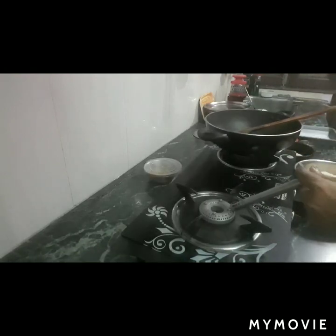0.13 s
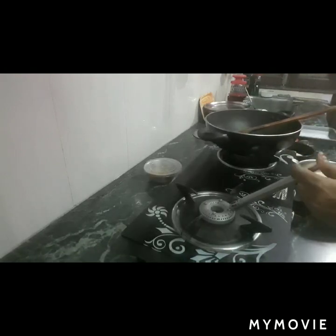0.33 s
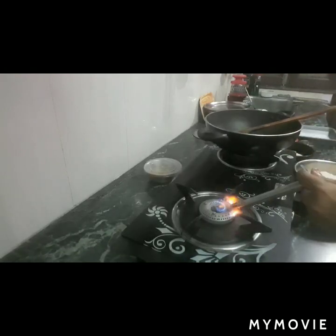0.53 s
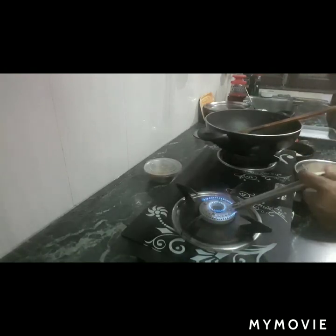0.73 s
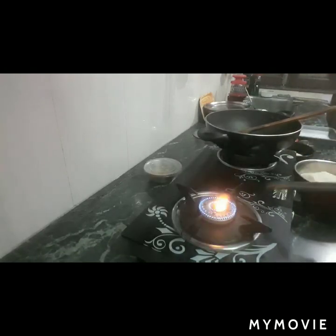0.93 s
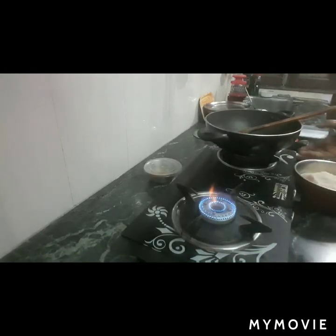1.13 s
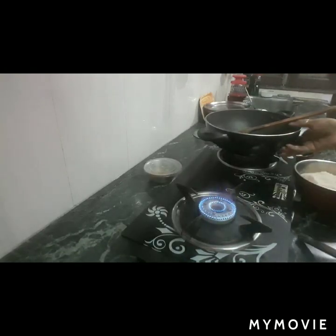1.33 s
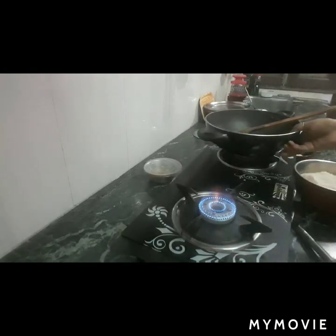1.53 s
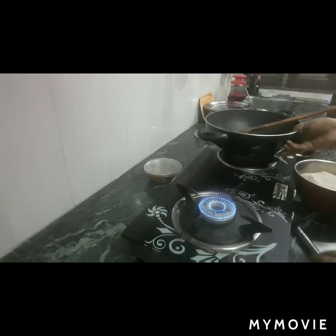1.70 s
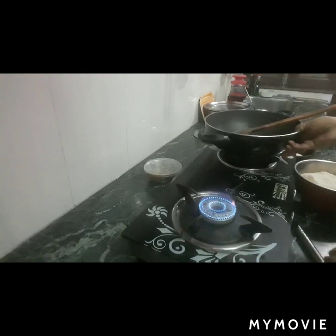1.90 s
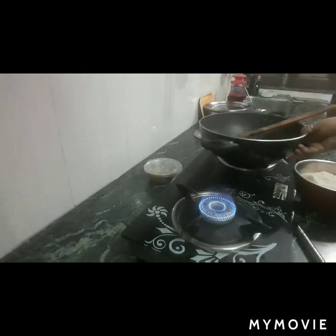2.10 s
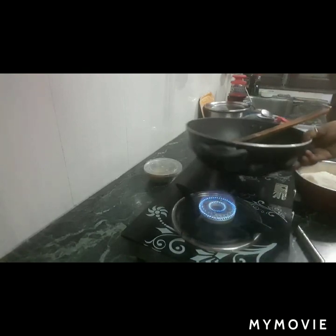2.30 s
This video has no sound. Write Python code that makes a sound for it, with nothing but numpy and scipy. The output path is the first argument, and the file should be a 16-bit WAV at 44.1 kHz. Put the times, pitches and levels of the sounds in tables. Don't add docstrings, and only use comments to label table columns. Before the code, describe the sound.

A spring gas lighter snaps loudly twice, a burner softly catches, then a metal pan clanks

```python
import sys
import numpy as np
from scipy import signal
from scipy.fft import rfft, irfft
from scipy.io import wavfile
from scipy.ndimage import uniform_filter1d

SR = 44100
rng = np.random.default_rng(int(sys.argv[2]) if len(sys.argv) > 2 else 0)


def int16_out(signal):
    q = np.round(np.clip(np.atleast_2d(signal).T, -1, 1) * 32767)
    wavfile.write(sys.argv[1], SR, q.astype(np.int16))


def decibels_to_gain(level_db):
    exponent = np.asarray(level_db, float) / 20
    return 10 ** exponent


N = 103635


def evened(x):
    return x / np.sqrt(np.mean(x ** 2) + 1e-20)


def read(points, hz):
    f, value = np.transpose(points)
    return np.interp(np.log(hz + 1), np.log(f + 1), value)


def add(mix, s, sound):
    part = mix[round(s * SR):][:len(sound)]
    part += sound[:len(part)]


def resonate(x, hz, width_hz):
    r = np.exp(-np.pi * width_hz / SR)
    return 2 * signal.lfilter([1 - r], [1, -r * np.exp(2j * np.pi * hz / SR)], x).real


def coloured(x, db):
    y = irfft(rfft(x) * decibels_to_gain(db), len(x))
    return y / np.sqrt(np.mean(y ** 2))


def blows(events, crack_colour, body, ring_db, size=4096):
    rise_s, body_fade_s, evenness = 0.00053, 0.03, 1.1
    t, hz = np.arange(size) / SR, np.fft.rfftfreq(size, 1 / SR)
    cracks, body_rings = np.zeros((2, N))
    f, width_hz, mode_db = np.transpose(body)[:, :, None]
    modes = np.sqrt(width_hz) / (width_hz + 2j * (hz - f))
    for s, db, length_s, tilt_db in events:
        tilt = tilt_db * np.log2(np.clip(hz, 300, 15000) / 3000)
        shape = (1 - np.exp(-t / rise_s)) * np.exp(-t / length_s)
        burst = rfft(rng.standard_normal(size) * shape)
        burst = burst / np.sqrt(abs(burst) + 1e-9) ** evenness

        spot_db = 2.5 * rng.standard_normal((len(body), 1))
        response = (decibels_to_gain(mode_db + spot_db) * modes).sum(0)
        ring = irfft(burst * decibels_to_gain(tilt) * response) * np.exp(-t / body_fade_s)
        crack = irfft(burst * decibels_to_gain(read(crack_colour, hz) + tilt)) * shape ** 0.37

        energy = np.linalg.norm(shape)
        add(cracks, s, decibels_to_gain(db) * crack * energy / np.linalg.norm(crack))
        add(body_rings, s, decibels_to_gain(db + ring_db) * ring * energy / np.linalg.norm(ring))
    return np.array([cracks, body_rings])


def rings(events, rise_s):
    blur_share = 0.5
    t, out = np.arange(SR // 2) / SR, np.zeros(N)
    for s, hz, db, t60_s in events:
        near, turn = rng.random(2)
        neighbour_hz = hz + (2 + 3 * near) / t60_s
        pair = np.sin(2 * np.pi * hz * t)
        pair += blur_share * np.sin(2 * np.pi * (neighbour_hz * t + turn / 4))
        envelope = (1 - np.exp(-t / rise_s)) * decibels_to_gain(db - 60 * t / t60_s)
        add(out, s, envelope * pair / (1 + blur_share / 2))
    return out


def kitchen(x):
    # (frequency [Hz], t60 [s])
    decay = [(150, 0.28), (600, 0.5), (2000, 0.33), (5000, 0.35), (10000, 0.28), (16000, 0.27)]
    level_db, onset_s, spacing = -4, 0.0023, 12
    taps = np.zeros(SR)
    at = np.arange(0, SR - spacing, spacing)
    taps[at + rng.integers(0, spacing, len(at))] = rng.choice([-1., 1.], len(at))
    hz, t, z = signal.stft(taps, SR, nperseg=256)
    tail = signal.istft(z * decibels_to_gain(-60 * t / read(decay, hz)[:, None]), SR, nperseg=256)[1]
    tail = tail * (1 - np.exp(-np.arange(len(tail)) / SR / onset_s))
    return decibels_to_gain(level_db) * signal.fftconvolve(x, tail / np.linalg.norm(tail))[:N]


def background():
    # (frequency [Hz], level [dB])
    air_colour = [(40, -28), (100, -23.5), (310, 0.5), (420, -7.5), (1000, -8.5), (3000, -15.5),
                  (7000, -21), (16000, -27.5)]
    # (frequency [Hz], level [dB])
    gas_colour = [(40, -16), (100, -8.5), (300, -3), (600, -5), (1700, -9.5), (4000, -15), (7000, -23.5),
                  (16000, -26.5)]
    # (time [s], level [dB], share of unlit hiss [0-1])
    gain = [(0, -46, 0.43), (.22, -46, 0.87), (.56, -52.5, 0.9), (.95, -57.5, 0), (1.401, -59.5, .05),
            (1.7, -58.5, 0), (2.1, -52.5, 0), (2.35, -52.5, 0.3)]
    hop = 256
    frames, hz = N // hop + 5, np.fft.rfftfreq(1024, 1 / SR)
    a, b, patches = rng.standard_normal((3, 513, frames))
    patches = uniform_filter1d(patches, size=10, axis=0)
    patches = evened(uniform_filter1d(patches, size=10, axis=1))
    s, db, unlit = np.transpose(gain)
    share = np.clip(np.interp(np.arange(frames) * hop / SR, s, unlit), 0, 1)
    field = decibels_to_gain(read(gas_colour, hz)[:, None] * share + read(air_colour, hz)[:, None] * (1 - share))
    field = field / np.linalg.norm(field, axis=0) * decibels_to_gain(0.7 * patches)
    hiss = evened(signal.istft((a + 1j * b) * field, nperseg=1024, noverlap=1024 - hop)[1][:N])
    whine = evened(resonate(rng.standard_normal(N), 10400, 220))
    return decibels_to_gain(np.interp(np.arange(N) / SR, s, db)) * (hiss + decibels_to_gain(-27) * whine)


def flame():
    # (time [s], level [dB])
    flutter = [(.68, -79), (.8, -58.5), (.92, -62), (1.0, -59), (1.08, -65.5), (1.301, -81.5), (1.5, -70),
               (2.35, -70)]
    hz, width_hz = 103, 150
    puff = resonate(resonate(rng.standard_normal(N), hz, width_hz), hz, width_hz)
    return decibels_to_gain(np.interp(np.arange(N) / SR, *np.transpose(flutter), left=-120)) * evened(puff)


def thumps():
    # (time [s], pitch [Hz], level [dB], t60 [s])
    counter_modes = [(.252, 160, -26, .17), (.69, 102, -35, .2), (.68, 160, -36, .18), (1.81, 105, -49, .2),
                     (1.88, 110, -46, .4), (1.77, 320, -45, .14), (2.18, 330, -38, .07),
                     (1.152, 320, -51, .07), (1.81, 300, -44, .1), (2.14, 310, -46, .15),
                     (2.22, 290, -44, .08), (2.26, 330, -48, .1), (.97, 100, -48, .3)]
    return rings(counter_modes, rise_s=0.01)


def rubs(size=4096):
    # (time [s], level [dB], length [s], centre [Hz], spread [octaves])
    strokes = [(.249, -15, 0.03, 2200, 3.55), (0.382, -36.5, 0.027, 3970, 1.4),
               (0.466, -44, 0.014, 2970, 1.8), (0.602, -42, .028, 890, 0.78),
               (0.603, -42, 0.026, 3440, 0.7), (.605, -45, 0.027, 6400, 0.43),
               (0.646, -52, 0.01, 10500, .3), (0.83, -41, 0.022, 4200, 0.75),
               (0.831, -45.5, .025, 2000, 0.61), (0.838, -47.5, 0.015, 900, 0.67),
               (0.879, -56.5, 0.037, 1700, 0.63), (0.052, -49, 0.016, 2500, 1.2),
               (1.672, -65, 0.019, 13500, .15), (0.609, -51.5, .03, 14300, .15),
               (1.828, -48, 0.045, 4500, 0.43), (1.92, -40.5, 0.085, 2360, 2.15),
               (2.037, -49, 0.026, 3500, 1.34)]
    grit_db = 1.8
    t, hz, out = np.arange(size) / SR, np.fft.rfftfreq(size, 1 / SR), np.zeros(N)
    for s, db, length_s, centre_hz, spread in strokes:
        noise, bumps = rng.standard_normal((2, size))
        colour = np.maximum(-6 * (np.log2((hz + 1) / centre_hz) / spread) ** 2, -50)
        swell = np.sin(np.pi * np.clip(t / length_s, 0, 1) ** 0.72)
        grit = evened(uniform_filter1d(bumps, size=60))
        add(out, s, decibels_to_gain(db + grit_db * grit) * swell * coloured(noise, colour))
    return out


def ringing_parts():
    # (time [s], pitch [Hz], level [dB], t60 [s])
    lighter_parts = [(.239, 7100, -9, .035), (.242, 3600, -20, .06), (.257, 860, -15, .11),
                     (.256, 1510, -20, .12), (.25, 1855, -21, .1), (.268, 4080, -16, .05),
                     (.255, 617, -21, .12), (.4, 5000, -36, .06), (.838, 5050, -37, .07),
                     (.832, 1950, -39, .06), (.836, 3500, -39, .05), (.467, 1830, -33, .055),
                     (.615, 4980, -36, .09), (.612, 10700, -44, .09), (.603, 3500, -38, .1),
                     (.604, 750, -39, .08), (.612, 1050, -41, .1), (.674, 3550, -14, .05),
                     (.674, 7100, -12, .035), (.675, 2270, -18, .05), (.681, 620, -24, .12),
                     (.682, 900, -21, .06), (.683, 3200, -19, .08), (1.4575, 651, -35, .035),
                     (1.457, 1000, -41, .05), (1.456, 3330, -49, .08), (1.494, 3340, -43, .06),
                     (1.494, 5400, -50, .05), (1.494, 7200, -48, .04), (1.495, 680, -41, .05),
                     (1.494, 1720, -47, .05), (1.51, 3340, -45, .045), (1.512, 700, -43, .05),
                     (1.52, 3340, -46, .045), (1.521, 5400, -49, .04)]
    # (time [s], pitch [Hz], level [dB], t60 [s])
    pan_parts = [(1.715, 3350, -27, .028), (1.715, 4650, -28, .03), (1.716, 7310, -27, .04),
                 (1.807, 3720, -16, .06), (1.807, 5700, -20, .05), (1.817, 6990, -16, .045),
                 (1.817, 4680, -23, .04), (1.818, 5840, -22, .07), (1.868, 5000, -20, .04),
                 (1.868, 7100, -18, .045), (1.869, 1810, -25, .05), (1.869, 3150, -25, .05),
                 (1.87, 6090, -24, .06), (1.887, 8200, -22, .04), (1.911, 4850, -24, .04),
                 (1.912, 7900, -25, .04), (2.037, 4000, -39, .08), (2.036, 6000, -41, .08),
                 (2.033, 4950, -44, .08), (1.807, 7000, -22, .04), (1.915, 5900, -30, .08),
                 (1.832, 7000, -30, .06)]
    # (time [s], pitch [Hz], level [dB], t60 [s])
    rubbed_parts = [(.28, 2266, -21, .18), (.32, 875, -28, .12), (.343, 865, -28, .09),
                    (.7, 1627, -33, .15), (.712, 2270, -31, .25), (1.96, 810, -39, .2),
                    (1.975, 1335, -40, .2), (2.0, 1340, -38, .2), (2.036, 2220, -36, .13)]
    struck = rings(lighter_parts, rise_s=0.0012) + rings(pan_parts, rise_s=0.0012)
    return struck + rings(rubbed_parts, rise_s=0.005)


def counter_taps():
    # (time [s], level [dB], contact length [s], brightness [dB per octave])
    taps = [
        (1.456, -39.5, 0.0057, -1),
        (1.493, -39.5, 0.0035, 0),
        (1.510, -42, 0.0043, -4),
        (1.521, -49.5, 0.0051, 0.5),
    ]
    # (frequency [Hz], level [dB])
    crack_colour = [(40, -50), (120, -16), (300, -2), (650, 0), (900, -0.5), (2500, -9.5), (5000, -15),
                    (16000, -21)]
    # (frequency [Hz], width [Hz], level [dB])
    body = [(300, 55, -7), (680, 80, -7), (1060, 100, -2), (1690, 100, -1), (4150, 250, -3.5),
            (5260, 200, -8)]
    return blows(taps, crack_colour, body, ring_db=-6.5)


def pan_clanks():
    # (time [s], level [dB], contact length [s], brightness [dB per octave])
    clanks = [
        (1.7145, -20, 0.0031, 5.5),
        (1.719, -37, 0.011, -3.5),
        (1.806, -20, 0.0089, 0.5),
        (1.817, -15.5, 0.0045, 5.5),
        (1.868, -19, 0.005, 0.5),
        (1.887, -20, 0.0063, 5),
        (1.911, -25, 0.0066, 0),
        (1.952, -39.5, 0.013, -1),
        (2.032, -35.5, 0.0038, -4.5),
    ]
    # (frequency [Hz], level [dB])
    crack_colour = [(60, -76), (300, -5.5), (1200, 0.5), (2500, -3), (3500, 5), (7000, -4.5), (11000, -7),
                    (16000, -7.5)]
    # (frequency [Hz], width [Hz], level [dB])
    body = [(1830, 140, -4.5), (2320, 150, -5.5), (2850, 130, -6), (3350, 710, -11), (4850, 84, -7),
            (5440, 130, -2), (5950, 97, -11), (7480, 930, 9.5), (10200, 190, -3), (11270, 180, -1),
            (11100, 330, -17), (13000, 210, -23)]
    return blows(clanks, crack_colour, body, ring_db=-5.5)


def lighter_snaps():
    # (time [s], level [dB], contact length [s], brightness [dB per octave])
    snaps = [
        (.238, -11, 0.012, 1),
        (.243, -13, 0.019, -1.5),
        (.282, -13.5, 0.01, 4),
        (.602, -38, 0.016, -3.5),
        (.673, -4, 0.0045, 1),
        (.682, -16.5, 0.013, -1.5),
        (.892, -39, .002, 5),
        (.913, -38, 0.003, 9),
    ]
    # (frequency [Hz], level [dB])
    crack_colour = [(100, -19), (300, -16), (800, -6.5), (2000, -8.5), (4000, -4), (7000, -5.5),
                    (11000, -4.5), (16000, -5.5)]
    # (frequency [Hz], width [Hz], level [dB])
    body = [(620, 60, -9), (837, 130, -1.5), (1635, 90, 3), (2250, 28, -3), (3330, 200, -2.5),
            (3510, 91, 7), (3890, 67, 6), (4670, 130, -14), (6940, 400, -4.5), (12000, 500, -4)]
    return blows(snaps, crack_colour, body, ring_db=-13.5)


def scene():
    crack, ring = counter_taps() + pan_clanks() + lighter_snaps()
    rub, parts = rubs(), ringing_parts()
    room = kitchen(crack + rub + decibels_to_gain(-6) * ring + decibels_to_gain(-18) * parts)
    direct = decibels_to_gain(-3) * crack + rub + ring + parts
    return (background() + flame() + thumps() + room + direct)[None]


def band_limit(x):
    return signal.sosfilt(signal.butter(12, 16810, fs=SR, output="sos"), x)


def record(dry):
    # (frequency [Hz], level [dB])
    microphone = [(30, -24), (90, 3.5), (7300, 0), (8300, -8), (9600, -8.5), (10800, -3), (16000, -7.5)]
    clip_level, edge_hz, loud_edge_hz, edge_opens_db = 0.75, 15750, 16450, -27
    dry = irfft(rfft(dry) * decibels_to_gain(read(microphone, np.fft.rfftfreq(N, 1 / SR))), N)
    dry = clip_level * np.tanh(dry / clip_level)

    def below(hz):
        lowpass = signal.firwin(511, hz, window=("kaiser", 9), fs=SR)
        return signal.oaconvolve(dry, lowpass[None], "same")

    low = below(edge_hz)
    top = below(loud_edge_hz) - low
    ahead = uniform_filter1d(dry ** 2, size=600, origin=-200)
    past = uniform_filter1d(dry ** 2, size=600, origin=299)
    rising = ahead > decibels_to_gain(2 * edge_opens_db) + 4 * past
    mix = low + top * uniform_filter1d(rising * 1., size=128)
    return band_limit(mix)


dry = scene()
out = record(dry)
int16_out(out)
```